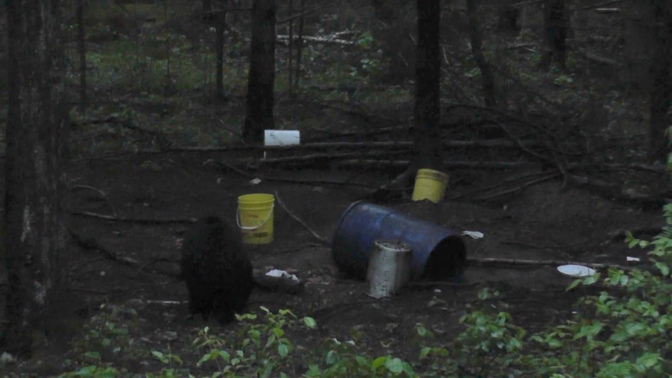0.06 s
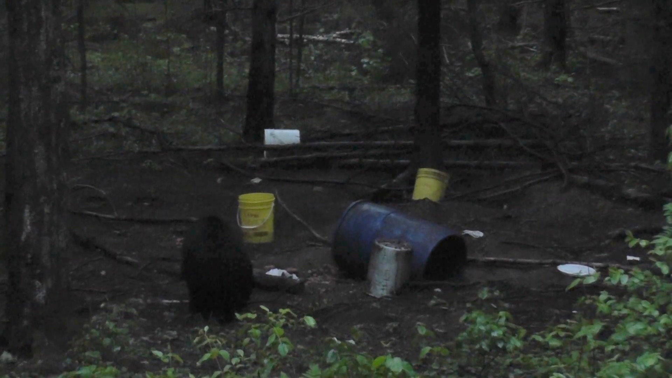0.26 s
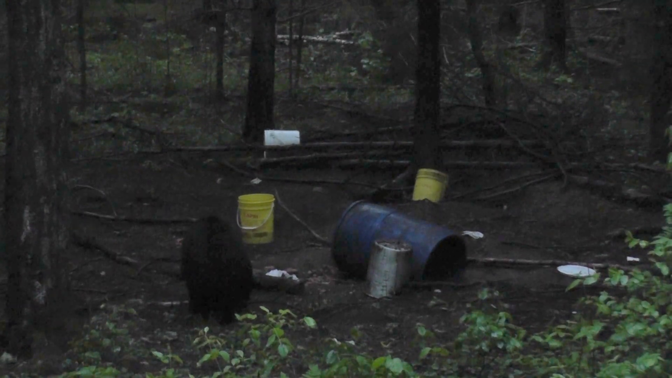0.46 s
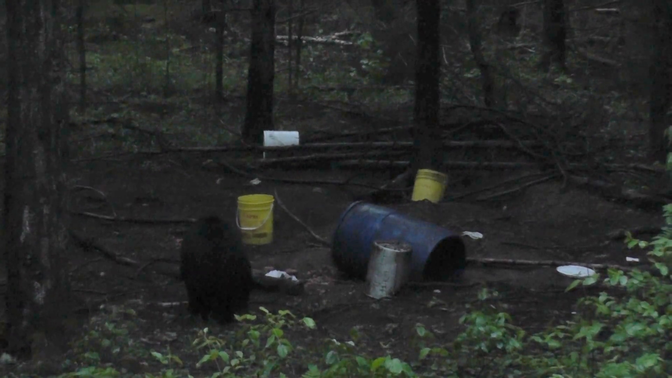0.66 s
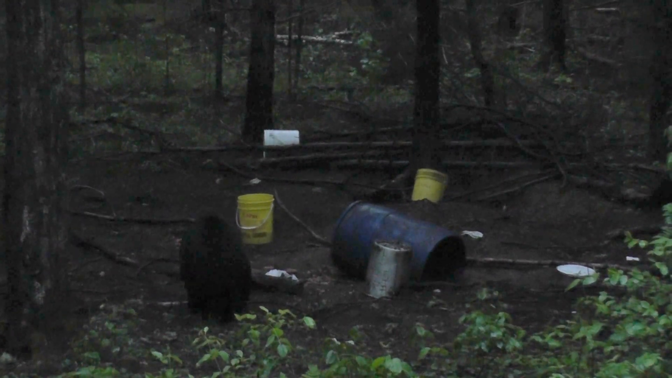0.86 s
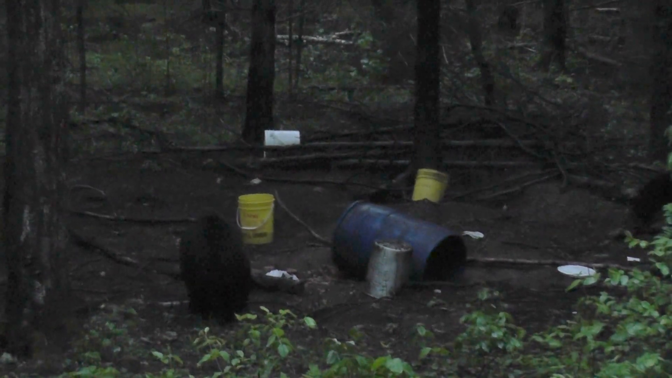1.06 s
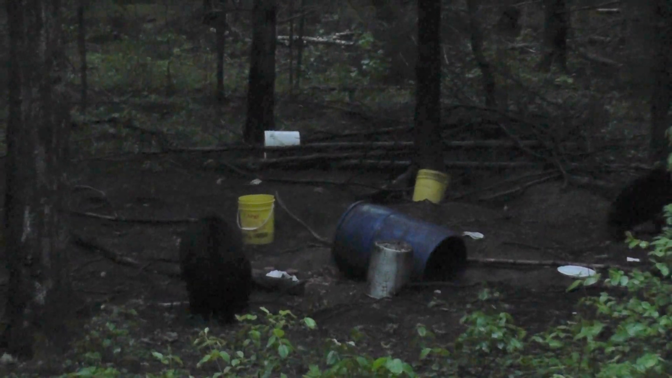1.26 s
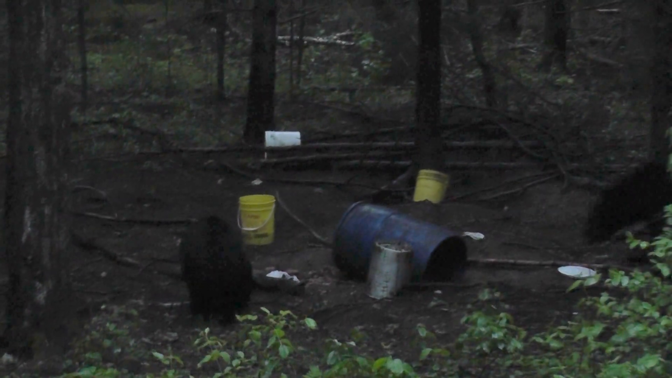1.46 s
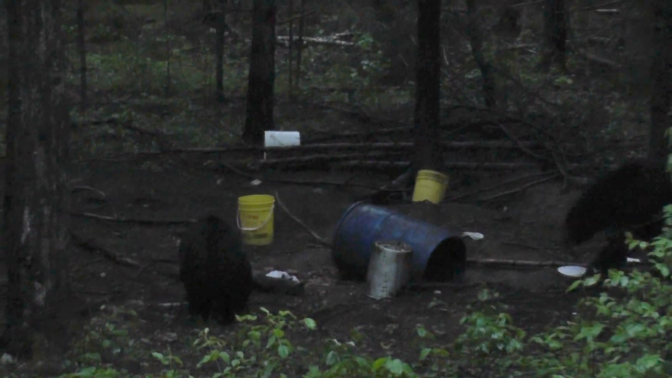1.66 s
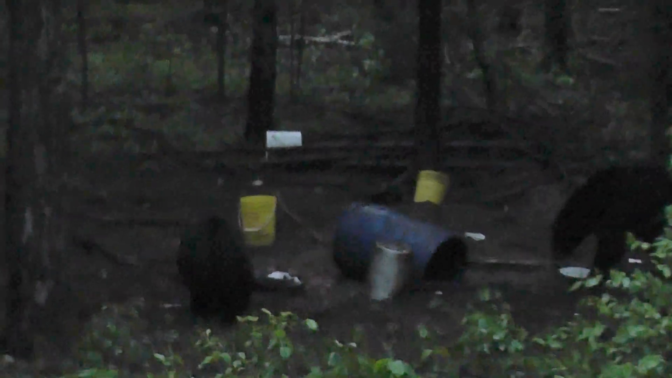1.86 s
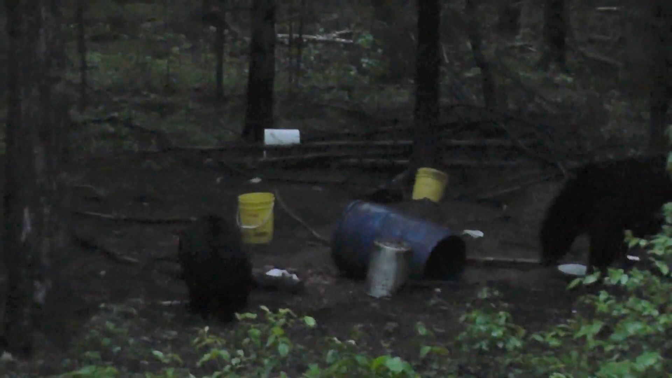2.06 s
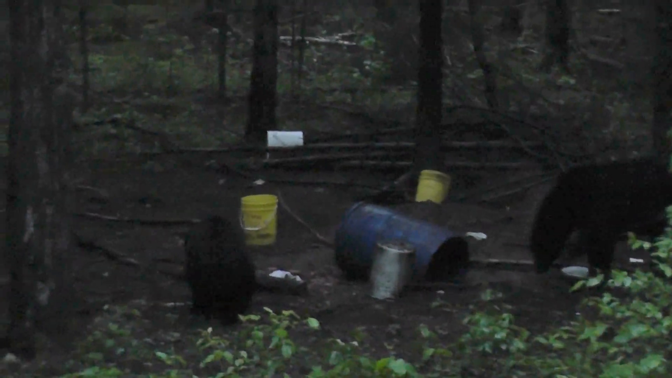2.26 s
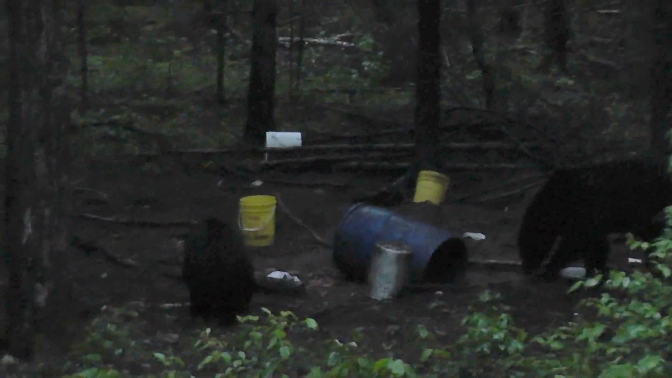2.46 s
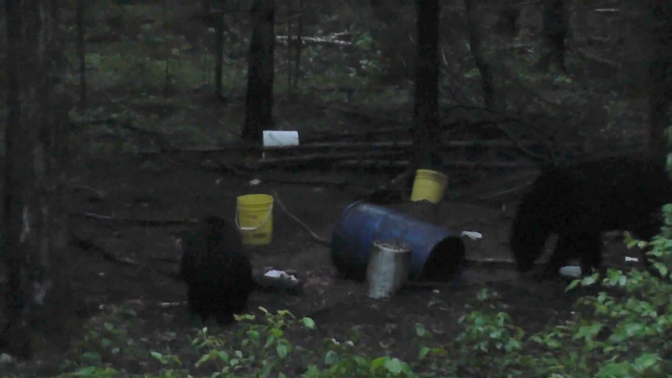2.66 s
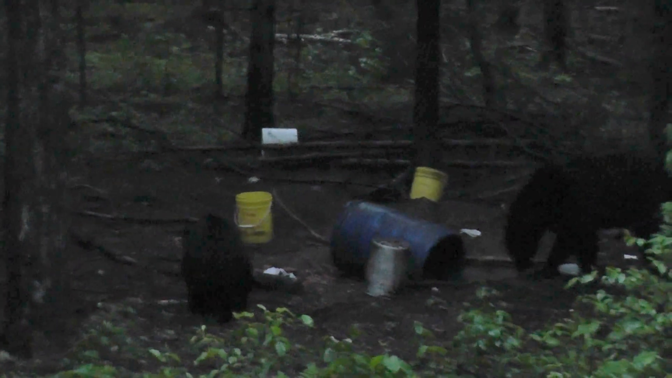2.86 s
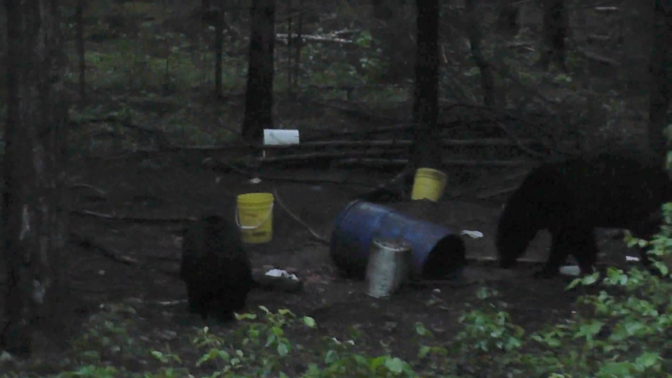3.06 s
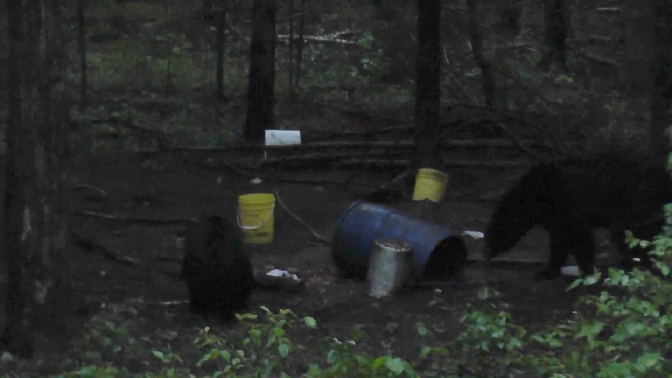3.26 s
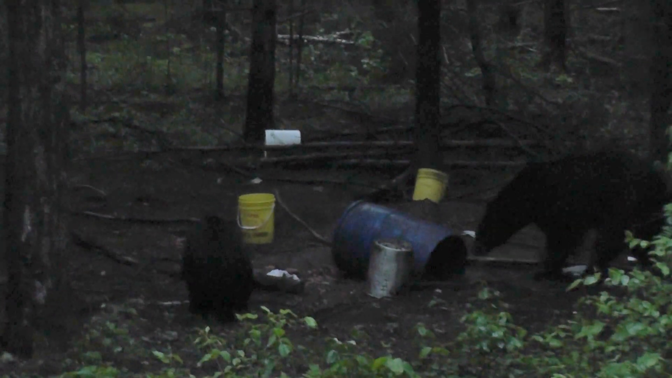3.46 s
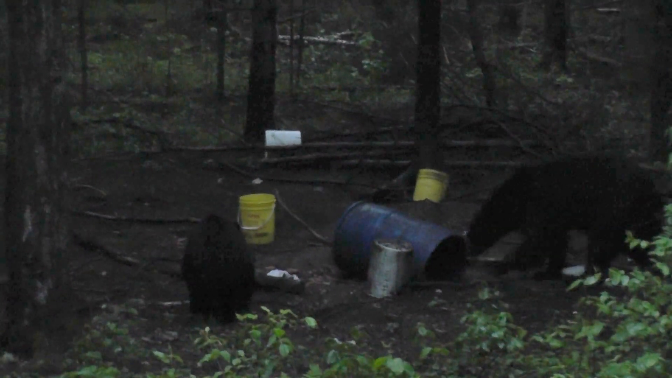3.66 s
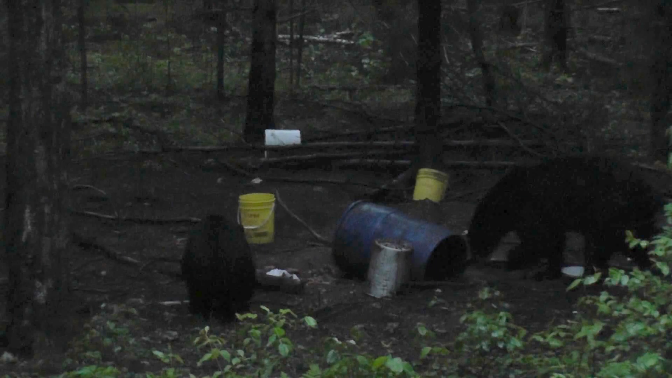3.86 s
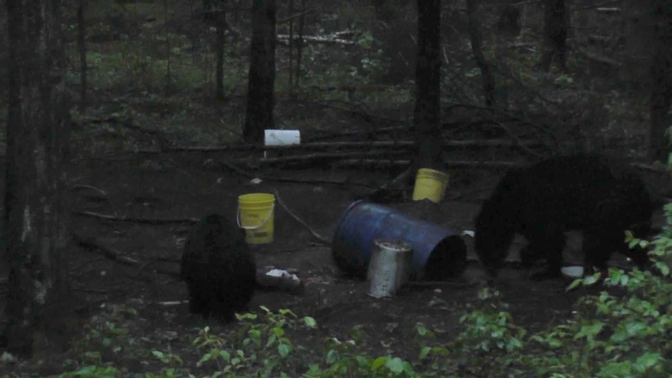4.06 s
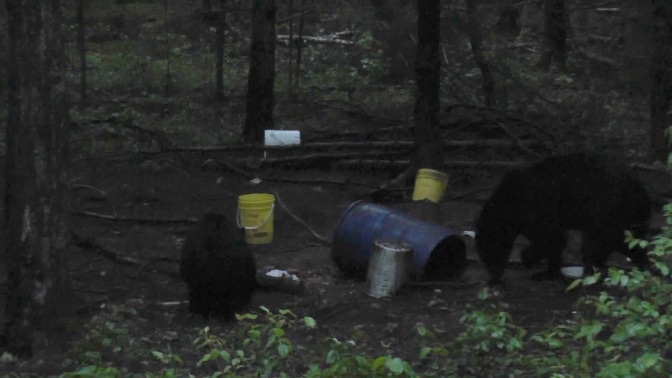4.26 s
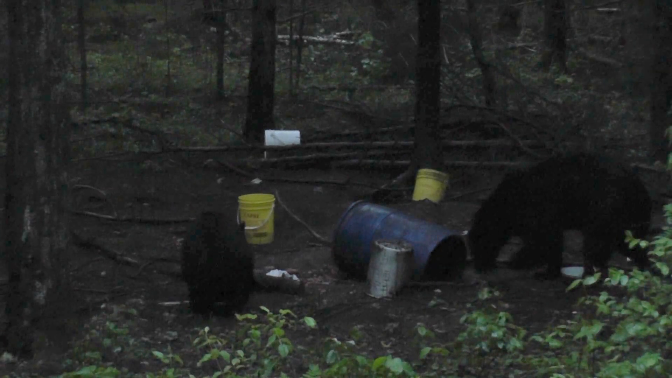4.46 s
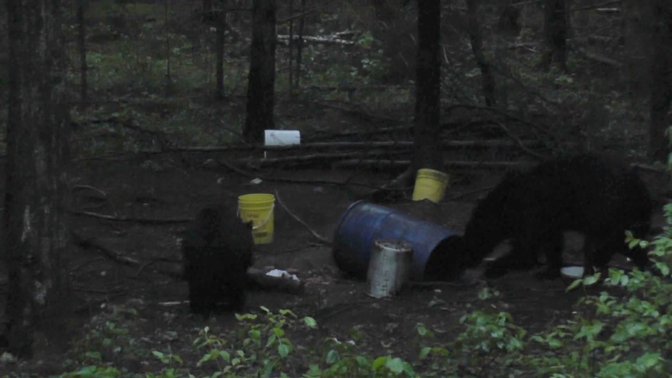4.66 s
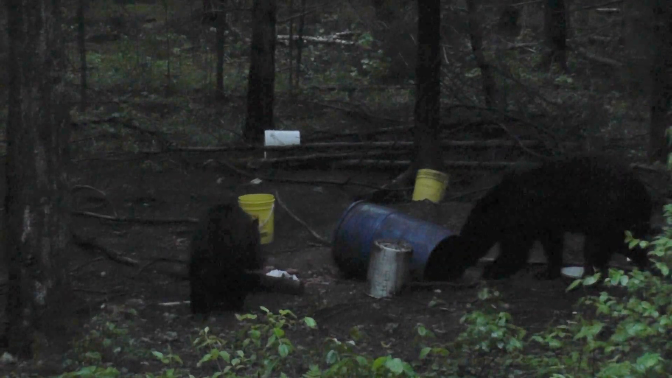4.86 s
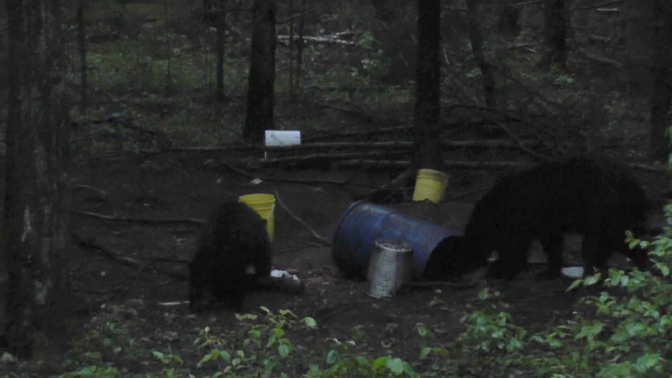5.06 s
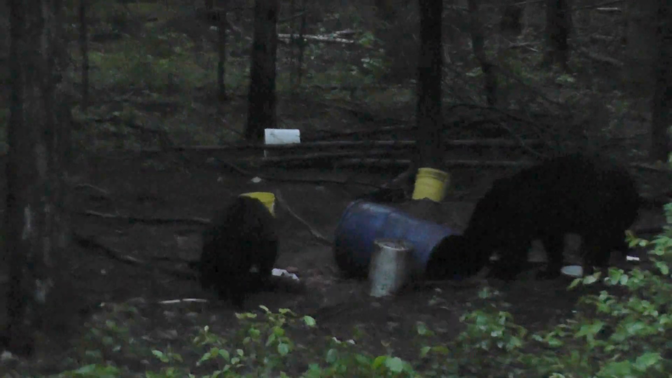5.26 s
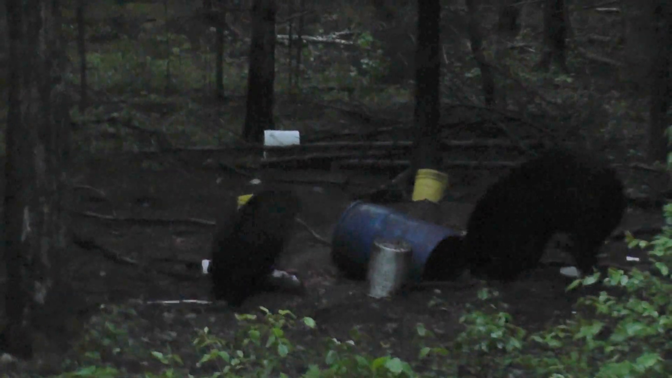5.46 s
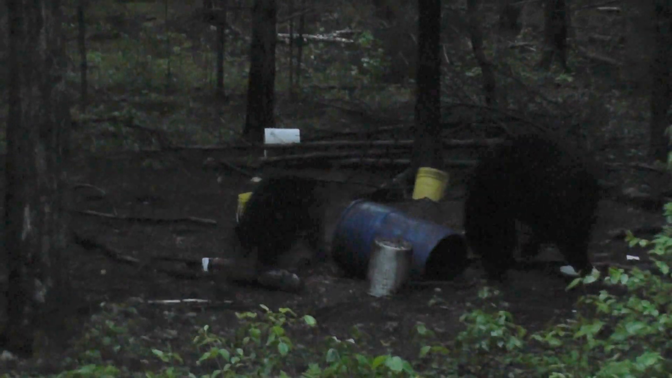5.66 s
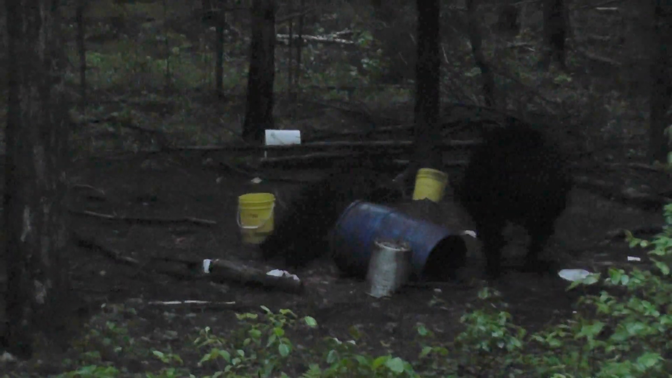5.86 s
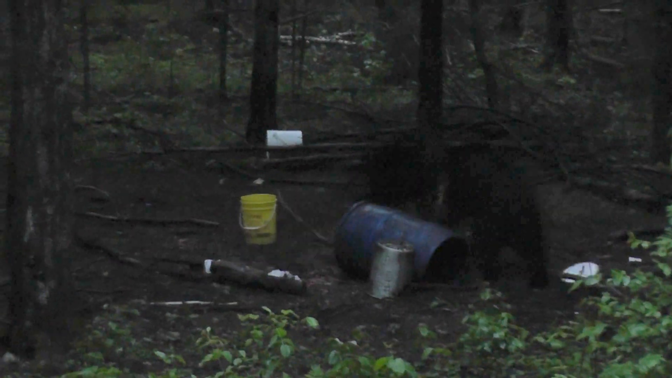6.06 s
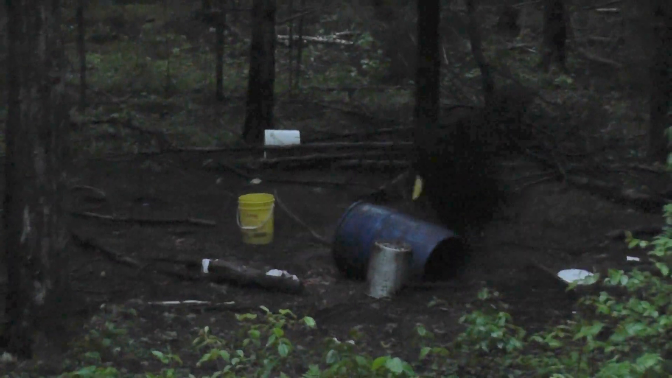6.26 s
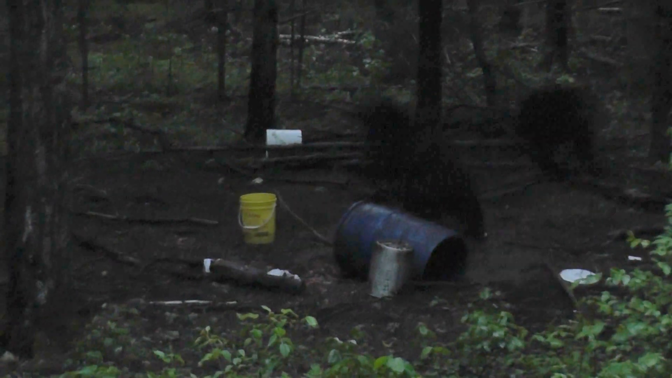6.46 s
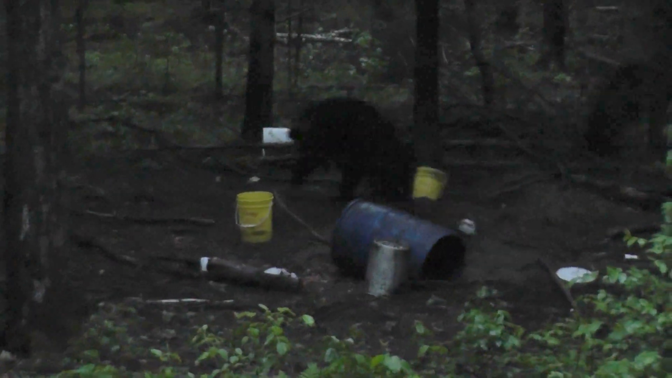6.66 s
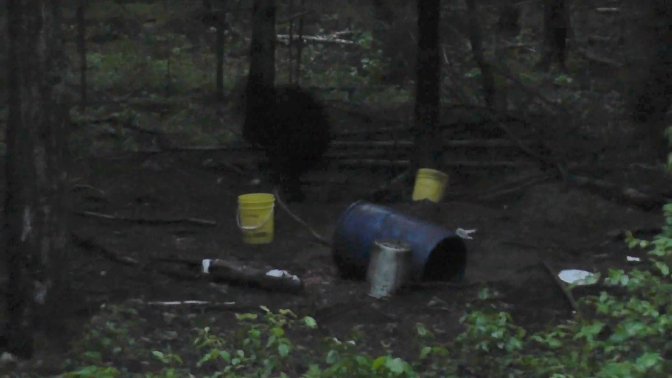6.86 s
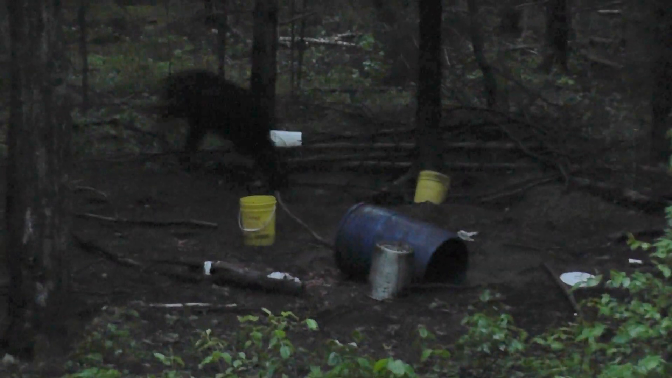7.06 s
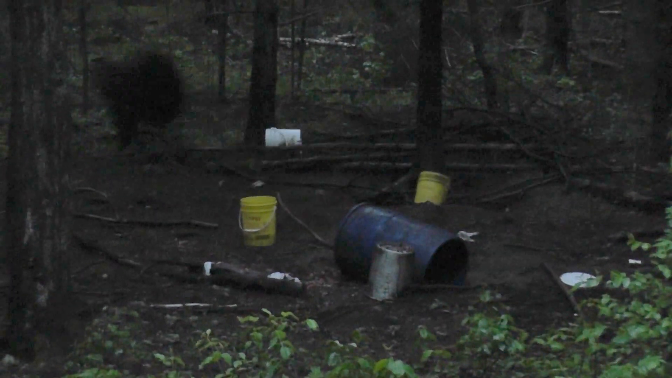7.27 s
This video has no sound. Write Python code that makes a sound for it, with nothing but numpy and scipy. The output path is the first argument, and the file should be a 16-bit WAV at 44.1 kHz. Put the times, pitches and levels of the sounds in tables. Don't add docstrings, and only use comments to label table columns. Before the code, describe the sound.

Mostly quiet woods: soft air, leaf hiss, scattered tiny ticks and plops, and a low fluttering distant motor. A dull pail knock comes midway. A close bow release bursts out, bright and rattling, followed by a dull arrow impact, rubbing and faint squeaks, a deep drum thump, then dull hoof-like footfalls, swishing leaves and sharp wood cracks as heavy animals run off. Small microphone, open forest, short faint echo.

```python
import sys
import numpy as np
from scipy import signal
from scipy.fft import rfft, irfft, next_fast_len
from scipy.io import wavfile
from scipy.ndimage import uniform_filter1d, map_coordinates

SR = 44100
rng = np.random.default_rng(int(sys.argv[2]) if len(sys.argv) > 2 else 0)


def to_wav(s):
    ch = np.atleast_2d(s).T
    pcm = np.round(np.clip(ch, -1, 1) * 32767)
    wavfile.write(sys.argv[1], SR, pcm.astype(np.int16))


def natural_amplitude(level_db):
    exponent = np.asarray(level_db, float) / 20
    return 10 ** exponent


N = 322812

# (frequency [Hz], density [dB])
RUMBLE = [(30, -42), (60, -22), (110, -10), (200, -3), (400, -0.5), (850, -3.5), (1100, -33), (2000, -26)]
# (frequency [Hz], density [dB])
HISS = [(2000, -20), (4700, -5), (6000, -6), (7600, -3.5), (9800, -6), (13000, -7), (16500, -2.5)]


def unit(x):
    return x / np.sqrt(np.mean(x ** 2) + 1e-20)


def along(points, hz):
    f, v = np.transpose(points)
    return np.interp(np.log(hz + 1), np.log(f + 1), v)


def curves(rows):
    s, *cols = np.transpose(rows)
    return [np.interp(np.arange(N) / SR, s, c, left=-120, right=-120) for c in cols]


def wobble(rate):
    knots = rng.standard_normal(int(N * rate / SR) + 4)
    return map_coordinates(knots, [np.arange(N) * rate / SR])


def sides(pan_db):
    return natural_amplitude(np.array([[pan_db / 2], [-pan_db / 2]]))


def swells(rows):
    power = np.zeros((2, N))
    for s, db, over_db, rise, fall in rows:
        first, last = max(round((s - .6) * SR), 0), min(round((s + 1.2) * SR), N)
        t = np.arange(first, last)
        lag = t / SR - s
        event_db = db - 60 * np.where(lag < 0, -lag / rise, lag / fall)
        power[:, t] += natural_amplitude(2 * event_db) * natural_amplitude([[0], [2 * over_db]])
    return np.sqrt(power)


def rush(spectrum, patchy_db, grain_db):
    # (frequency [Hz], correlation [0-1])
    alike = [(30, .4), (70, 0.26), (200, 0.63), (600, 0.74), (1500, 0.85), (3000, 0.93), (6000, 0.98),
             (9000, 0.65), (14000, 0.2)]
    grains = natural_amplitude(grain_db * wobble(500) + grain_db * wobble(60))
    hz, _, z = signal.stft(rng.standard_normal((2, N)) * grains, SR, nperseg=512)
    patches = uniform_filter1d(uniform_filter1d(rng.standard_normal(z.shape[1:]), 6, 0), 8, 1)
    turn = np.arccos(np.clip(along(alike, hz), -1, 1))[:, None] / 2
    z = z * natural_amplitude(patchy_db * unit(patches) + along(spectrum, hz)[:, None])
    mid, side = signal.istft(z * [np.cos(turn), np.sin(turn)], nperseg=512)[1][:, :N]
    return unit(np.array([mid + side, mid - side]))


def cracks(rows, spike, low_hz=180, size=4096):
    out, t = np.zeros((2, N + SR)), np.arange(size) / SR
    f = np.fft.rfftfreq(size, 1 / SR)
    small = (1j * f / (low_hz + 1j * f)) ** 2
    click = spike * np.exp(-t / .00003)
    for s, db, hz, ring_db, t60, pan_db in rows:
        noise = rng.standard_normal((3, size))
        fade = natural_amplitude(-60 * t / max(t60, .002)) + 1.2 * natural_amplitude(-60 * t / 0.0036)
        fade = fade * (1 - np.exp(-t / 0.00017))
        width = 0.54 * hz
        resonance = 1j * f * width / (hz * hz - f * f + 1j * f * width)
        wood = 1 + natural_amplitude(ring_db) * np.sqrt(9000 / width) * resonance
        burst = click + (noise[0] + 0.092 * noise[1:]) * fade
        burst = irfft(rfft(burst) * wood * small, size)
        start = round(s * SR)
        out[:, start:start + size] += natural_amplitude(db - 12.0) * sides(pan_db) * burst
    return out[:, :N]


def struck(s, db, modes, attack):
    out, t = np.zeros(N + SR), np.arange(SR // 3) / SR
    ring = 0
    for k, (hz, level, t60) in enumerate(modes):
        ring = ring + (-1) ** k * natural_amplitude(level - 60 * t / t60) * np.sin(2 * np.pi * hz * t)
    start = round(s * SR)
    out[start:start + len(t)] = natural_amplitude(db) * ring * (1 - np.exp(-t / attack))
    return out[:N]


def bow_string():
    # (time [s], peak [dB], ring [Hz], ring level [dB], t60 [s])
    string_events = [(5.094, -20, 7300, -3, 0.07), (5.098, -30, 2700, 3, .02), (5.106, -34, 1000, 14, 0.07),
                     (5.111, -16, 3100, 7, 0.05), (5.1128, -12, 3800, 4, .02), (5.1136, -11, 6000, 1, 0.03),
                     (5.1155, -7.5, 6400, 0, 0.025), (5.117, -22, 2100, 9, .04),
                     (5.1185, -10, 6000, -1, 0.015), (5.124, -11, 7500, -13, 0.03),
                     (5.123, -22, 2700, 10, .06), (5.1305, -11, 7500, -8, .025),
                     (5.138, -25, 1400, 8, 0.07), (5.15, -31, 1690, 13, 0.05), (5.165, -31, 1570, 14, 0.05)]
    return cracks([(*row, -4.5) for row in string_events], 0.62, size=8192)


def bow_limbs():
    # (time [s], level [dB])
    limb_blows = [
        (5.1136, -10),
        (5.1178, -6.5),
        (5.1265, -19),
        (5.1298, -16),
        (5.1365, -19),
        (5.147, -25),
        (5.156, -28),
        (5.166, -27),
        (5.18, -31),
        (5.099, -33),
    ]
    # (frequency [Hz], level [dB], t60 [s])
    limb_modes = [(133, -18, 0.038), (278, -12, 0.032), (417, -6, 0.013), (610, 1.5, 0.02),
                  (1040, -4.5, .012), (1660, -9, .02)]
    return sum(struck(s, db, limb_modes, 0.00089) for s, db in limb_blows) * sides(-7.5)


def arrow_strike():
    # (frequency [Hz], level [dB], t60 [s])
    strike = (5.3735, -22, [(240, -2, 0.036), (470, 0.5, 0.031), (907, 0, .04), (1500, -10, 0.039),
              (3580, -2.5, 0.019)])
    return struck(*strike, 0.00068) * sides(-0.62)


def barrel():
    # (frequency [Hz], level [dB], t60 [s])
    shell = (5.9447, -23.5, [(206, -5, .14), (272, 0, .07), (330, -3, .12), (451, 0.5, 0.15),
             (542, -2, 0.081), (615, 1, 0.1), (713, -0.5, 0.11), (823, 11, 0.04), (1100, -4, 0.047),
             (1350, -2, 0.044), (1790, -1, 0.019), (2350, -2, 0.023)])
    inner_air = (5.957, -6.5, [(94, 0, .125), (125, -17, .1), (167, -10, .11)])
    return struck(*shell, 0.00038) * sides(1.0) + struck(*inner_air, 0.03) * sides(1.5)


def barrel_scrunch():
    # (time [s], peak [dB], ring [Hz], ring level [dB], t60 [s], left-right [dB])
    contacts = [
        (5.9447, -38.5, 700, 16, 0.15, .6),
        (5.946, -39, 1500, 12, .1, .6),
        (5.97, -43, 356, 18, .12, .6),
    ]
    return cracks(contacts, .3)


def squeaks():
    # (time [s], length [s], start [Hz], end [Hz], level [dB])
    rubs = [(1.765, .008, 1500, 1700, -44), (1.78, .014, 2750, 2750, -42), (1.793, .011, 1200, 1450, -38.5),
            (1.805, .008, 850, 1400, -38), (1.817, .008, 3800, 3900, -44), (5.46, .07, 525, 480, -43),
            (5.51, .04, 390, 375, -43), (5.54, .095, 430, 545, -39), (5.54, .05, 1900, 1800, -46),
            (5.56, .07, 1520, 1400, -46), (5.605, .045, 330, 315, -39), (5.6, .05, 1650, 1480, -43),
            (5.61, .04, 800, 800, -45), (5.635, .1, 1420, 1240, -41.5), (5.635, .075, 1800, 1730, -45),
            (5.67, .04, 800, 850, -45), (5.71, .03, 800, 780, -43), (5.72, .04, 450, 360, -44),
            (5.73, .09, 1240, 1240, -49), (5.73, .06, 1900, 1880, -48), (5.755, .07, 355, 390, -43),
            (5.84, .03, 480, 460, -48)]
    out = np.zeros(N)
    waver, flutter = 0.5 * wobble(70), natural_amplitude(2.5 * wobble(90))
    for s, length, from_hz, to_hz, db in rubs:
        n = round(s * SR) + np.arange(round(length * SR))
        u = np.linspace(0, 1, len(n))
        glide = 2 * np.pi * np.cumsum(from_hz + (to_hz - from_hz) * u) / SR
        own_waver = np.roll(waver, round(from_hz))[n]
        out[n] += natural_amplitude(db) * np.sin(np.pi * u) ** .7 * np.sin(glide + own_waver)
    return out * flutter


def breaking_wood():
    # (time [s], peak [dB], ring [Hz])
    twigs = [(6.487, -31, 8000), (6.4976, -11.5, 3800), (6.5395, -16, 7500), (6.5456, -21, 4100),
             (6.5889, -26, 2794), (6.6548, -25, 3680), (6.6967, -29, 3485), (6.7044, -25, 5210),
             (6.7131, -17.5, 5480), (6.717, -24, 7000), (6.7346, -17, 7500), (6.736, -27, 2900),
             (6.776, -29, 7000), (6.8608, -33.5, 6000), (6.8837, -31, 5500), (6.8932, -32, 6500),
             (6.9631, -24.5, 7000), (7.0239, -24, 8480), (7.1182, -30, 8000), (7.1256, -31, 6500),
             (7.1964, -29, 2880), (7.206, -13, 1900), (7.2509, -19.5, 7000), (7.2988, -30.5, 7000)]
    # (time [s], peak [dB])
    thick_wood = [(5.3738, -11), (5.5198, -33), (5.6915, -24), (5.6962, -23), (5.8216, -30.5),
                  (5.9441, -25), (6.0142, -25.5), (6.0771, -31), (6.107, -33), (6.128, -29), (6.4672, -32)]
    wood = twigs + [(s, db, 1400) for s, db in thick_wood]
    rows = []
    for s, db, hz in wood:
        t60 = .023 + .0008 * (db + 34)
        rows.append((s + .0007, db - 2.0, hz, -4, t60, -.4))
    return cracks(rows, 7.6, low_hz=900, size=2048)


def footfalls():
    # (time [s], peak [dB], pitch [Hz], t60 [s])
    steps = [
        (1.903, -43, 380, 0.04),
        (5.957, -22, 455, .07),
        (5.972, -29, 720, .06),
        (5.98, -29, 400, .09),
        (6.088, -35, 481, 0.095),
        (6.596, -36, 362.6, 0.054),
        (6.763, -36, 468, 0.062),
        (7.001, -37, 304, 0.06),
    ]
    # (time [s], level [dB], pitch [Hz])
    landings = [
        (1.77, -52, 108.7),
        (1.9, -47, 80),
        (6.09, -35.5, 75),
        (6.25, -40, 55),
        (6.55, -48, 65),
        (6.701, -42.5, 100),
        (6.82, -45.5, 75),
        (6.98, -41, 100),
        (7.03, -41, 60),
        (7.2, -43.5, 70),
    ]
    feet = sum(struck(s, db + 4.5, [(hz, 0, t60)], 0.0092) for s, db, hz, t60 in steps)
    thuds = sum(struck(s, db, [(hz, 0, .15)], 0.0093) for s, db, hz in landings)
    return feet + thuds


def brush():
    # (time [s], effort [dB])
    flight = [(5.09, -62), (5.15, -41), (5.25, -50.5), (5.37, -49), (5.385, -36), (5.43, -43.5),
              (5.82, -43.5), (5.9, -50), (6.0, -39.5), (6.1, -43.5), (6.8, -49), (7.32, -54.5)]
    # (time [s], scuff [dB], leaf swish over scuff [dB], rise [s], fall [s])
    shoves = [(1.772, -47, -16, .035, .2), (1.785, -46, 7, .04, .15), (1.797, -43, 7, 0.05, 0.15),
              (1.808, -44, 7, .05, .12), (1.818, -46, 4, 0.05, .09), (5.145, -41, 0, .02, 0.44),
              (5.375, -37, 7.5, 0.011, .35), (5.43, -47, 9, .3, .6), (5.57, -42, -3, .3, 1.2),
              (5.66, -39, -5, .5, .9), (5.77, -42.5, -8, .9, .45), (6.13, -48.5, -7, 0.74, 0.53),
              (6.33, -51, -1.5, .8, 1.18), (6.42, -49, -6, .6, .6), (6.498, -42, 12.5, 0.0077, .2),
              (6.57, -47, 12.5, 0.38, 0.59), (6.68, -51, 11.5, .5, .5), (6.72, -50, 12, .3, .5),
              (6.8, -49.5, 2, 0.8, 1.1), (6.98, -52, 9.5, 0.44, 0.65), (7.12, -58.5, 9.5, .6, .7),
              (7.207, -45, 11, .01, .28), (7.27, -49.5, 7.5, .3, 0.7)]
    # (frequency [Hz], density [dB])
    scuff_spectrum = [(500, -28), (1000, 3.5), (1400, 2.5), (2200, -1), (2800, -8), (4000, -7.5),
                      (5000, -15), (8000, -57)]
    effort_db, = curves(flight)
    scrape, swish = swells(shoves)
    tramp, scuff, leaves = rush(RUMBLE, 2, 1.2), rush(scuff_spectrum, 1.6, 1.6), rush(HISS, 1.6, 2)
    scuff_gain = np.hypot(natural_amplitude(effort_db - 8), scrape)
    leaf_gain = np.hypot(natural_amplitude(effort_db - 12), swish)
    return natural_amplitude(effort_db) * tramp + scuff_gain * scuff + leaf_gain * leaves


def pail_knock():
    # (frequency [Hz], level [dB], t60 [s])
    knock = (3.7038, -8.5, [(753, 9.5, 0.0105), (1500, -4, 0.007), (2500, -15, 0.0066), (342, -13, 0.03),
             (587, -9, 0.014)])
    return struck(*knock, 0.0018) * sides(-2.5)


def plops():
    # (time [s], peak [dB], pitch [Hz])
    drops = [(0.409, -38, 1690), (1.774, -28, 820), (1.92, -41, 1500), (3.288, -36, 700),
             (3.677, -36.5, 778), (3.869, -34, 686), (3.926, -40, 613), (4.54, -36.5, 622),
             (4.591, -46, 703), (5.3815, -26, 1500), (5.391, -29, 600), (6.033, -37, 1500),
             (6.078, -36, 1600), (6.086, -29.5, 1324), (6.998, -35, 800)]
    return sum(struck(s, db + 4, [(hz, 0, .018)], 0.00056) for s, db, hz in drops)


def drips():
    # (time [s], peak [dB], ring [Hz], ring level [dB], left-right [dB])
    twig_ticks = [(0.0273, -39, 1210, 5, -3), (0.0577, -31, 1660, 0, -1.0), (0.4103, -31, 2230, 5, -1),
                  (0.4225, -32, 1810, 7, 1.5), (1.0227, -36.5, 2760, -1, 0.5),
                  (1.275, -27, 2830, -0.5, 0.5), (1.7953, -26, 1250, -5, -1.5),
                  (2.1001, -32.5, 3595, 10.5, 2.5), (2.7107, -30.5, 1329, -3, -6),
                  (2.7288, -33.5, 1460, 6, 1.5), (3.2216, -38, 1314, -3, -10), (3.6774, -31, 1100, -1, -2),
                  (3.703, -21.5, 1100, 9, -2), (3.868, -36.5, 1563, 3.5, 1), (3.927, -33.5, 1123, 10, -1),
                  (4.0524, -28.5, 1511, -5, 3), (4.5399, -38.5, 1690, 9, -7), (4.592, -24.5, 1280, -2, 2)]
    # (time [s], peak [dB], left-right [dB])
    leaf_drips = [(0.502, -32, 1), (1.224, -35, 3), (1.3163, -26, 1.0), (1.647, -35, -2.0), (1.864, -40, 0),
                  (1.897, -38, 0), (1.937, -39, 0), (2.3958, -38, 0), (2.4138, -38, 0), (2.4343, -30, -14),
                  (2.563, -37, 0), (2.6193, -37, 0), (3.4913, -32, 3), (3.51, -30.5, 1.0), (4.4268, -27, 2)]
    # (time [s], peak [dB], ring [Hz])
    far_drips = [(0.0694, -47, 6840), (0.1441, -42, 6510), (0.7342, -43, 8480), (0.9467, -43, 3240),
                 (1.0394, -55, 2760), (1.3892, -43, 2690), (2.0238, -45, 2790), (2.2094, -50, 3100),
                 (2.3246, -49, 2870), (2.8554, -40, 6340), (2.9816, -42, 7180), (3.1472, -42, 7320),
                 (3.3588, -49, 2580), (3.6934, -22, 2730), (3.7319, -42, 2740), (3.7389, -37, 6800),
                 (3.7544, -48, 2940), (3.7988, -41, 7170), (3.8422, -45, 3420), (3.8945, -41, 6650),
                 (3.9589, -43, 2770), (4.153, -42, 6610), (4.1769, -42, 3010), (4.2413, -42, 5560),
                 (4.3625, -47, 7860), (4.6994, -51, 8110), (4.8194, -51, 3680), (4.9494, -49, 3110)]
    ticks = twig_ticks + [(s, db, 1450, -14, pan_db) for s, db, pan_db in leaf_drips]
    ticks = ticks + [(s + .001, db + 3, hz, -6, 0) for s, db, hz in far_drips]
    rows = [(s, db, hz, ring_db, .006, pan_db) for s, db, hz, ring_db, pan_db in ticks]
    return cracks(rows, 4.35, size=512)


def patter(count):
    rows = []
    for when, big, pitch, place in rng.random((count, 4)):
        rows.append((when * N / SR, -48 + 9 * big * big, 2000 + 7000 * pitch, 3, .005, 6 * place - 3))
    return cracks(rows, 1.6, size=512)


def engine():
    # (time [s], firing rate [Hz], loudness [dB])
    revs = [(0.0, 53.43, -56), (0.24, 55.1, -54), (0.6, 55.84, -53.5), (1.12, 57.8, -44), (1.45, 56.9, -45),
            (1.75, 58.9, -42), (2.3, 58.57, -46), (2.76, 58.52, -44), (3.24, 61.7, -42.5),
            (3.44, 61.16, -42.5), (4.13, 56.6, -51), (4.98, 52.07, -60.5), (5.46, 53.6, -58.5),
            (6.1, 53.44, -54.5), (6.692, 55.24, -56), (6.9, 56.1, -56.5), (7.1, 56.4, -53),
            (7.32, 56.9, -49.5)]
    # (level at middle loudness [dB], gain per loudness [dB/dB], loss once turned away [dB], slow fading [dB])
    orders_heard = [
        (-56, 0.12, 3, 1.4),
        (-50, 1.0, 0, 0.2),
        (-59, .7, 12, 1.6),
        (-65.5, 0.2, 10, 1),
    ]
    # (frequency [Hz], gain [dB])
    exhaust = [(156, -7), (168, 0), (312, 0), (343, 7.5), (356, -4)]
    rate, loud_db = curves(revs)
    turns = 2 * np.pi * np.cumsum(np.abs(rate)) / SR
    away = np.clip((np.arange(N) / SR - 4.95) / .15, 0, 1)
    tone = 0
    for order, (db, grows, lost_db, fade_db) in enumerate(orders_heard, start=3):
        level = db + grows * (loud_db + 50) - lost_db * away + fade_db * wobble(2.013)
        level = level + along(exhaust, order * rate) + 2.5 + 1.5 * wobble(16)
        tone = tone + natural_amplitude(level) * np.sin(order * turns + 0.42 * wobble(14))
    weak = natural_amplitude(-77.0) * np.sin(2 * turns) + natural_amplitude(-70.5) * np.sin(turns)
    smear = 1 + 0.22 * wobble(110)
    return (tone * smear + weak) * sides(-.6)


def woods():
    # rumble [dB], murmur [dB], leaf hiss [dB]
    still_db = (-54, -61.5, -70)
    # (time [s], murmur [dB], hiss over murmur [dB], rise [s], fall [s])
    puffs = [(0.0, -58.5, -7, .5, 1.7), (.42, -61, -2.5, 1.2, 1.7), (.6, -64, 3, 1.4, 1.5),
             (.75, -58, -10, 0.92, 1.3), (1.9, -60, -8, 1.5, 1.5), (2.44, -57, 3, 0.29, 1.3),
             (2.66, -56, 4, 1.3, 1.0), (2.76, -54.5, -8, 0.62, .25), (3.8, -60.5, -2.5, 2.5, 2.2),
             (4.05, -62, -7, 1.5, 0.91), (4.9, -67, 1, 2.02, .8)]
    # (frequency [Hz], density [dB])
    murmur_spectrum = [(400, -40), (1000, 6), (1500, 2), (3500, -7), (5000, -8), (8000, -31)]
    low, mid, high = natural_amplitude(still_db)
    stir, rustle = swells(puffs)
    rumble, murmur, hiss = rush(RUMBLE, 1.2, .6), rush(murmur_spectrum, 1.2, 1.5), rush(HISS, 1.2, 1.5)
    return low * rumble + np.hypot(mid, stir) * murmur + np.hypot(high, rustle) * hiss


def trunk_echo(x):
    # (frequency [Hz], t60 [s])
    trunk_decay = [(200, 0.22), (1500, 0.39), (8000, 0.2)]
    out, hop = np.zeros((2, N + SR)), SR // 3
    for start in range(0, N, hop):
        hz, t, z = signal.stft(rng.standard_normal((2, SR // 2)), SR, nperseg=256)
        fade = natural_amplitude(-60 * t / along(trunk_decay, hz)[:, None])
        tail = signal.istft(z * fade, SR, nperseg=256)[1]
        wet = signal.fftconvolve(x[None, start:start + hop], tail / np.linalg.norm(tail[0]), axes=1)
        late = start + 200
        out[:, late:late + wet.shape[1]] += wet
    return out[:, :N]


def scene():
    sharp = bow_string() + barrel_scrunch() + breaking_wood() + drips() + patter(count=340)
    dull = bow_limbs() + arrow_strike() + barrel() + squeaks() + footfalls() + pail_knock() + plops()
    echo = trunk_echo((sharp + 0.59 * dull).mean(0))
    echo = natural_amplitude(-17.5) * (echo + 0.52 * echo[::-1])
    return sharp + dull + echo + brush() + engine() + woods()


def low_pass(x):
    return signal.sosfilt(signal.butter(12, 16000, fs=SR, output="sos"), x)


def record(dry):
    # (frequency [Hz], gain [dB])
    housing = [(30, -18.5), (120, 0.5), (850, 0), (1000, -4.5), (1400, 1), (2200, -5.5), (3000, 0.5),
               (4000, -1), (4700, -7), (5800, 0), (7000, 5.5), (8300, 5.5), (9600, -3.5), (12000, -10.5),
               (15600, -17), (16600, -35)]
    m = next_fast_len(N + 8192)
    cep = irfft(np.log(natural_amplitude(along(housing, np.fft.rfftfreq(m, 1 / SR)))), m)
    cep[1:m // 2] *= 2
    cep[m // 2 + 1:] = 0
    x = irfft(rfft(dry, m) * np.exp(rfft(cep)), m)[:, :N]
    x = x / (1 + (x / .85) ** 4) ** .25
    return low_pass(x)


dry = scene()
out = record(dry)
to_wav(out)
```